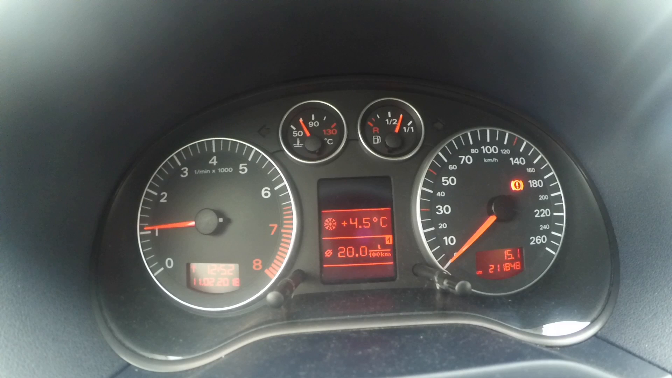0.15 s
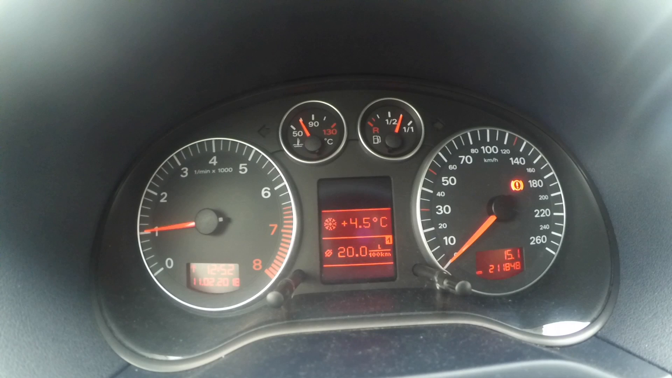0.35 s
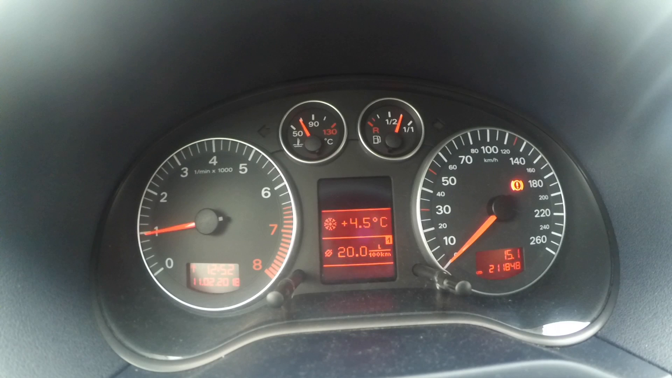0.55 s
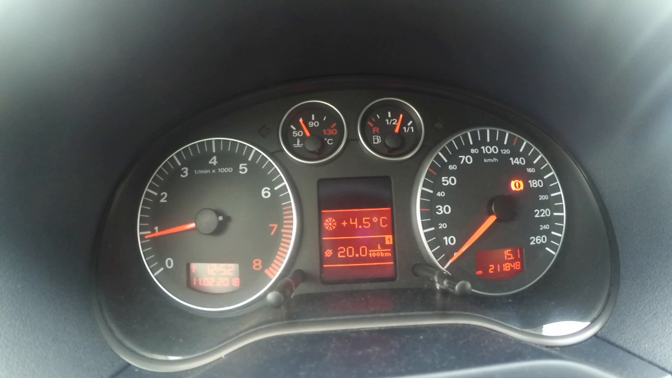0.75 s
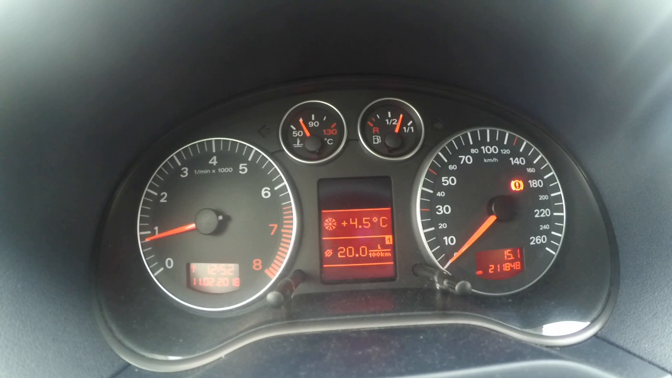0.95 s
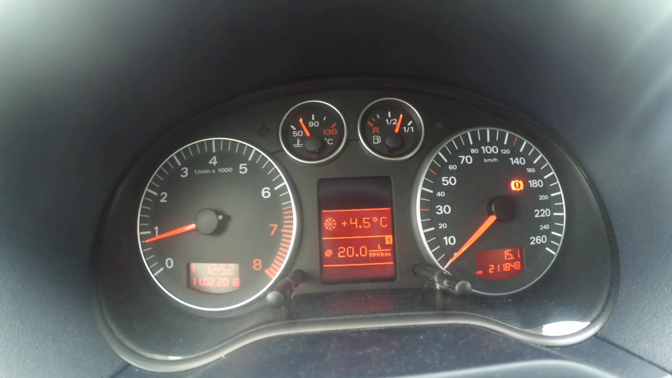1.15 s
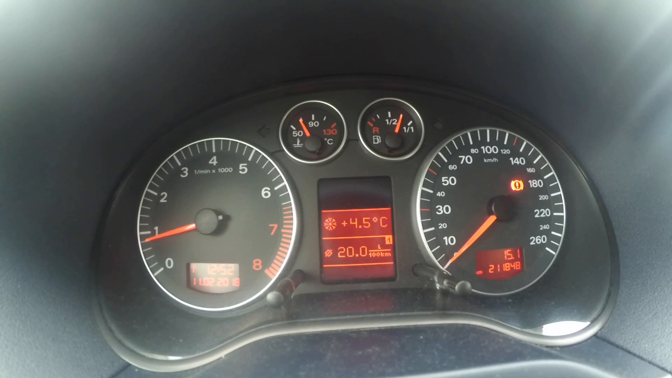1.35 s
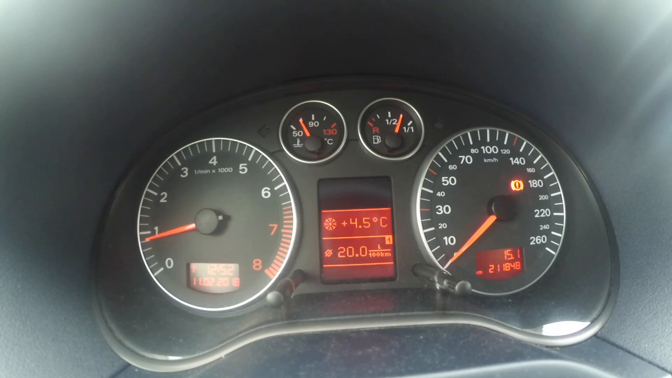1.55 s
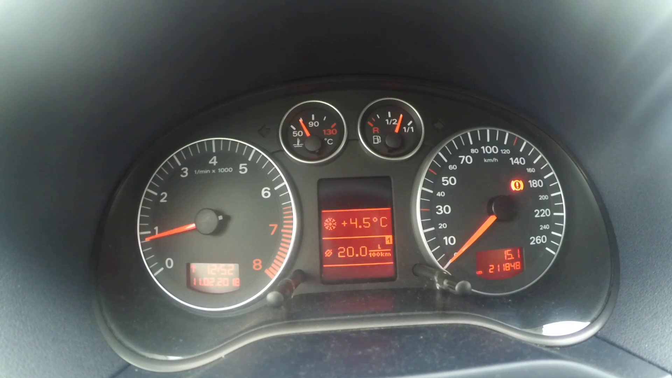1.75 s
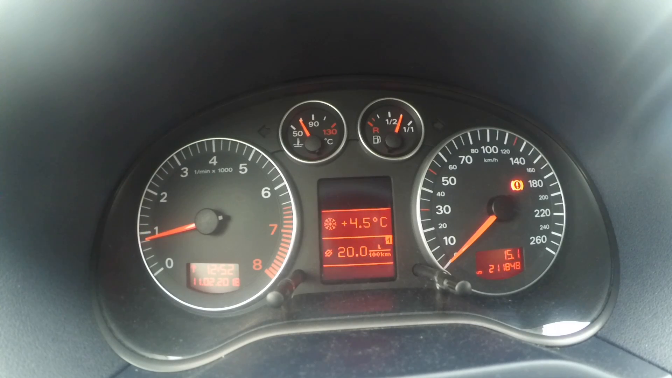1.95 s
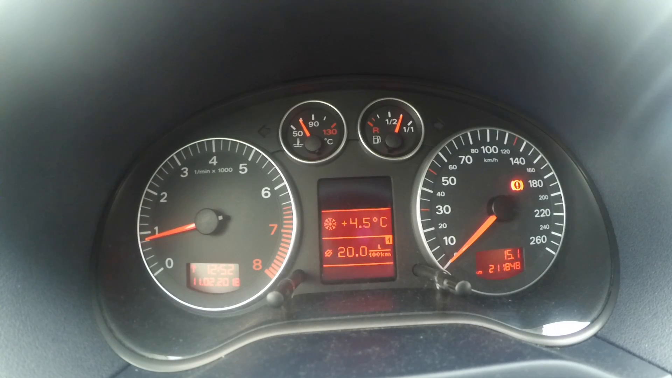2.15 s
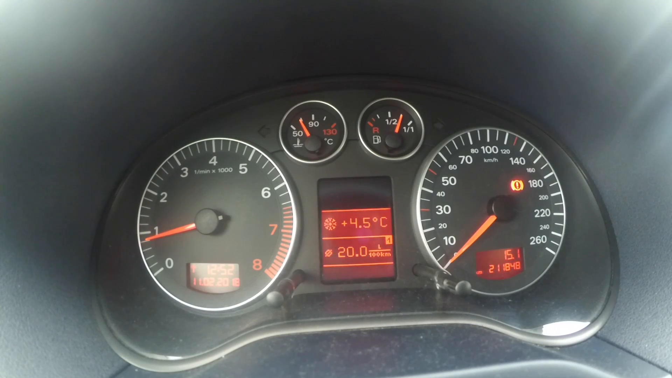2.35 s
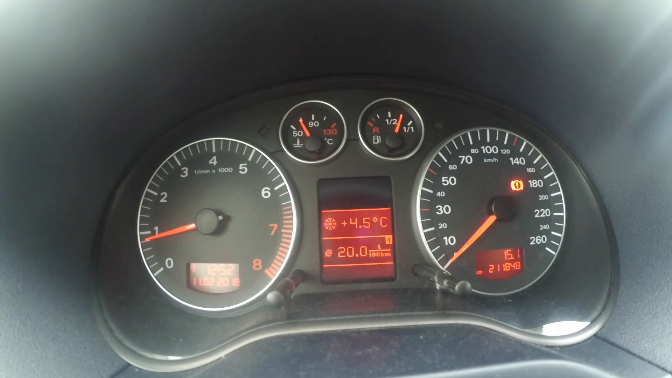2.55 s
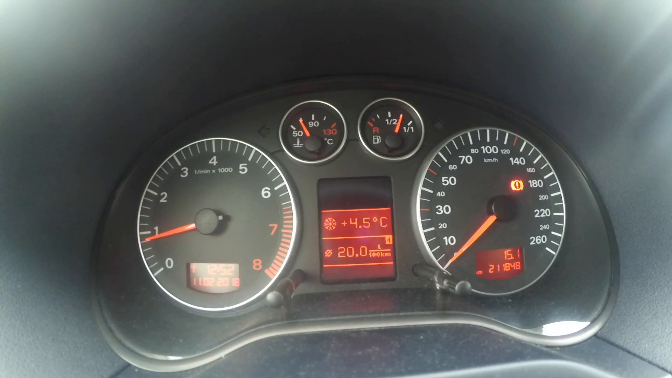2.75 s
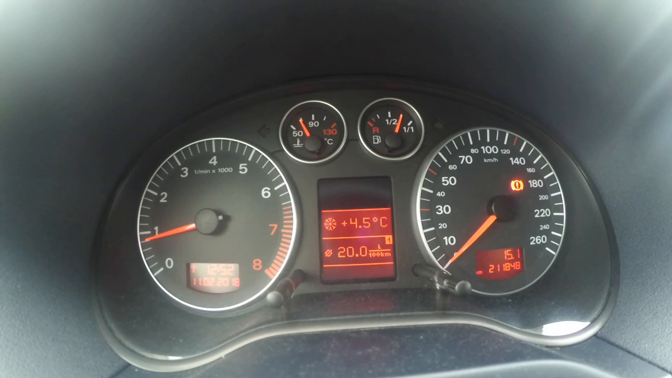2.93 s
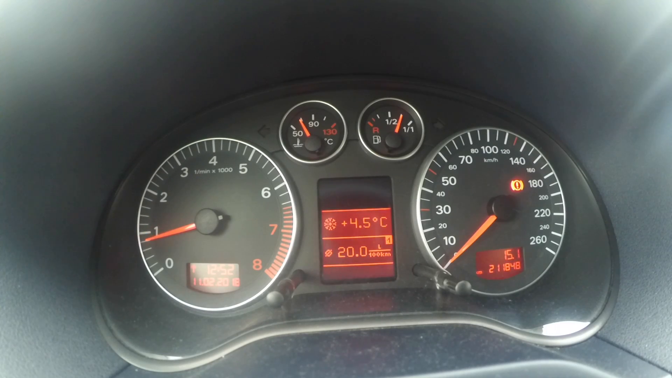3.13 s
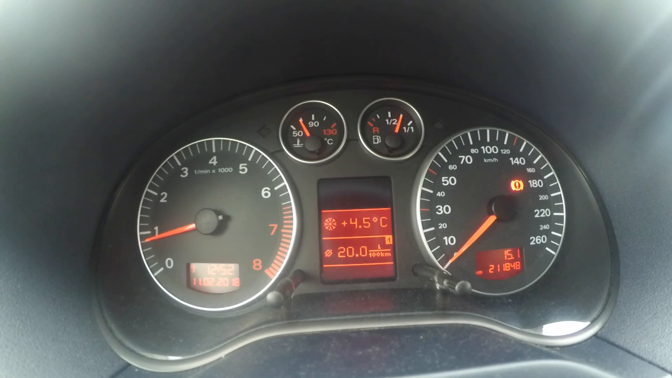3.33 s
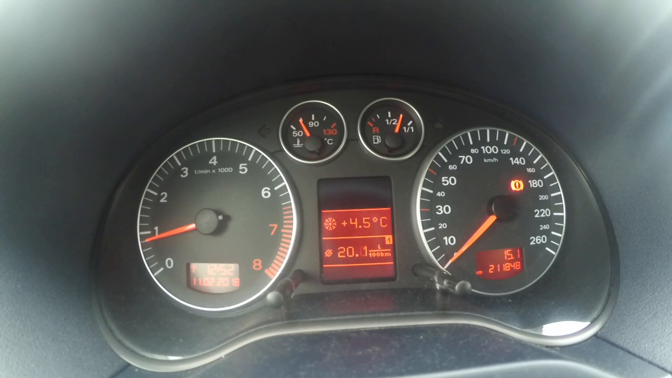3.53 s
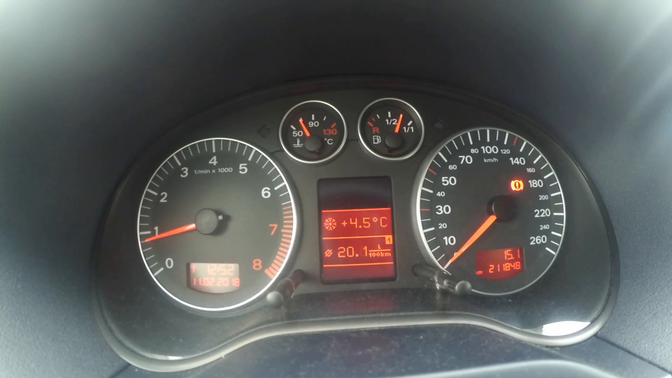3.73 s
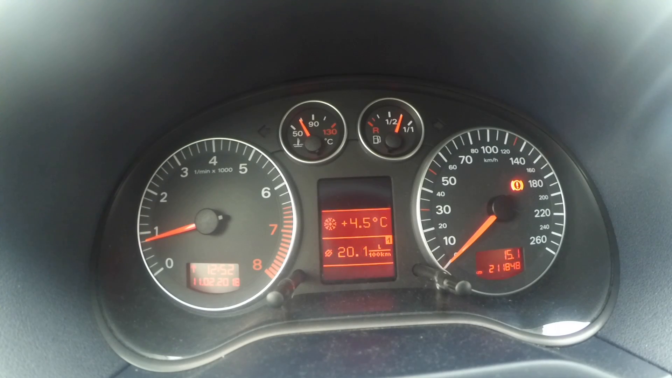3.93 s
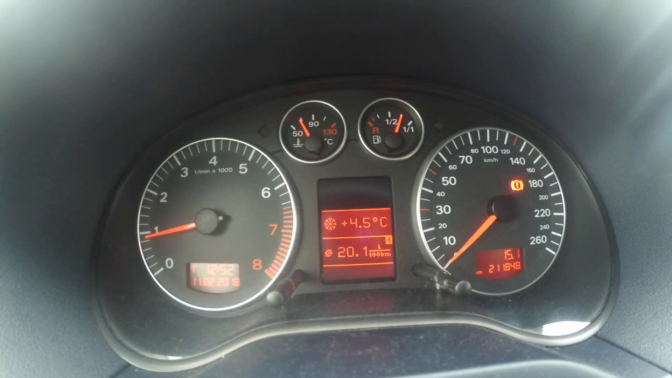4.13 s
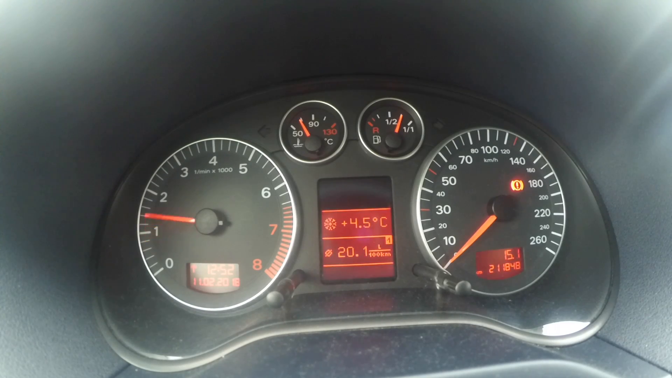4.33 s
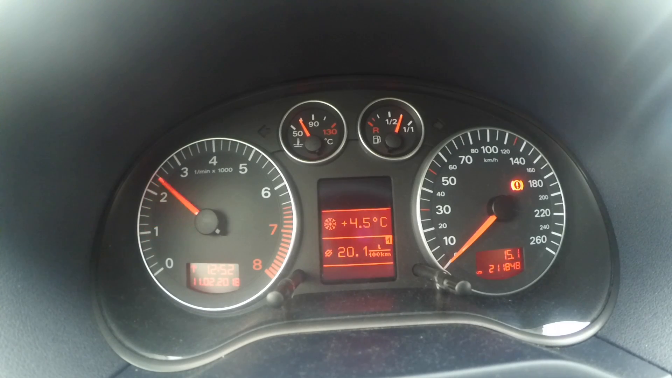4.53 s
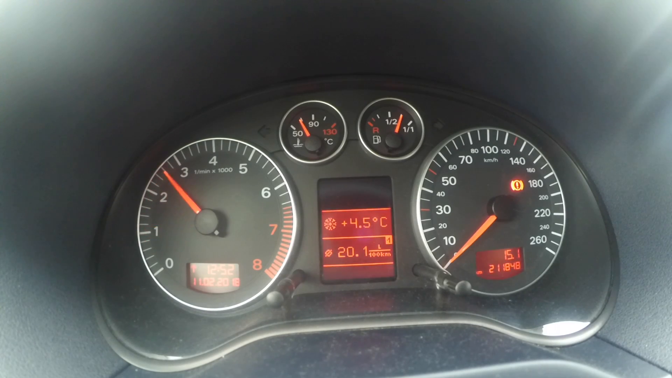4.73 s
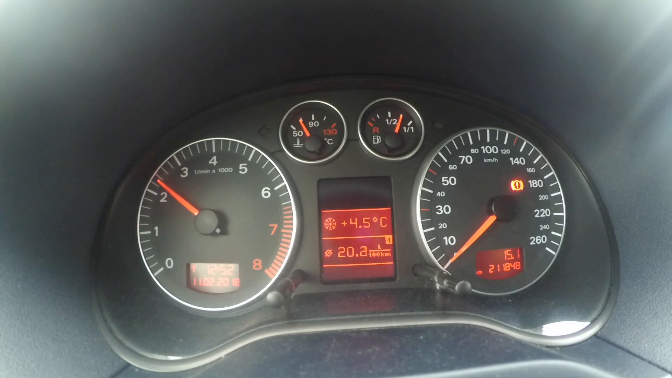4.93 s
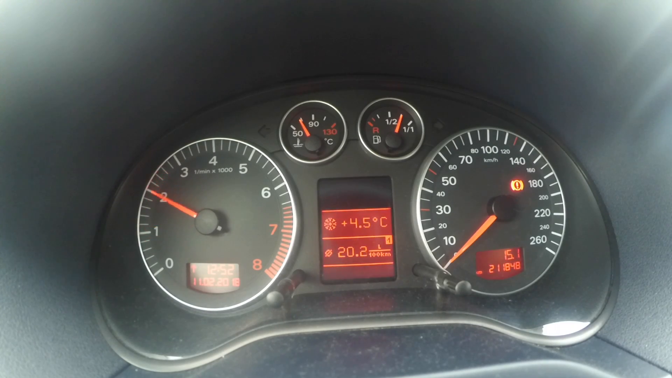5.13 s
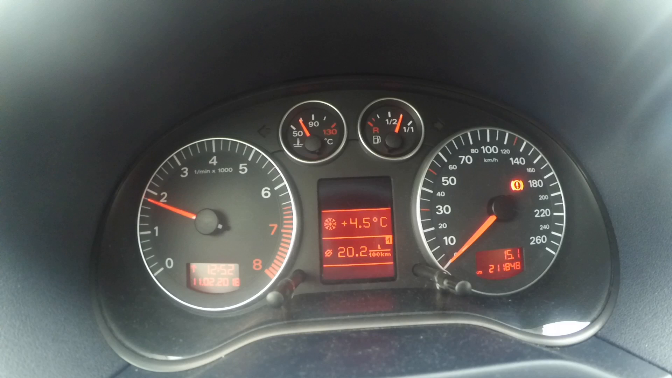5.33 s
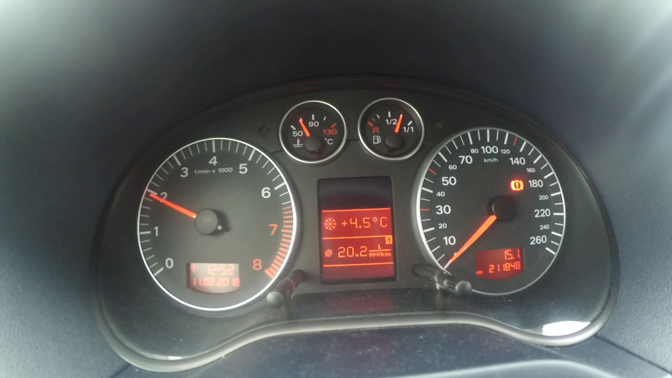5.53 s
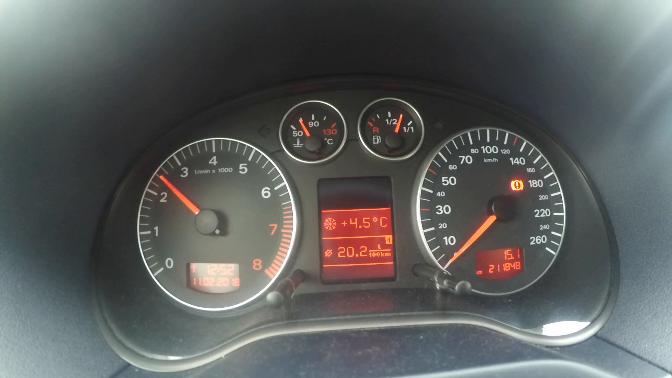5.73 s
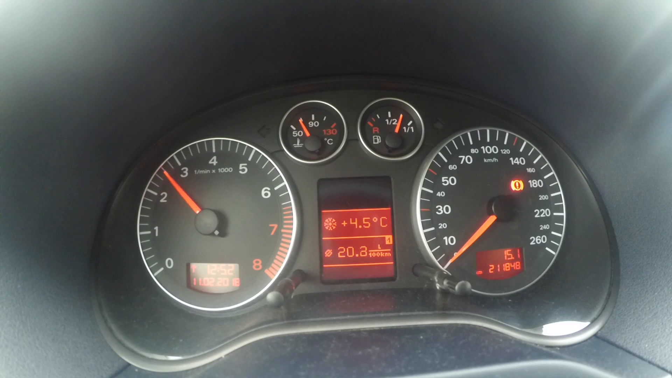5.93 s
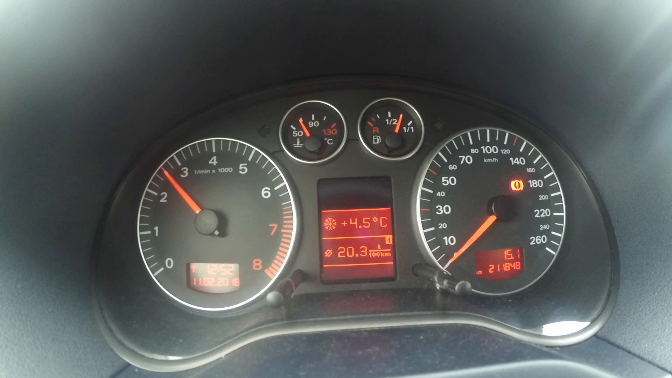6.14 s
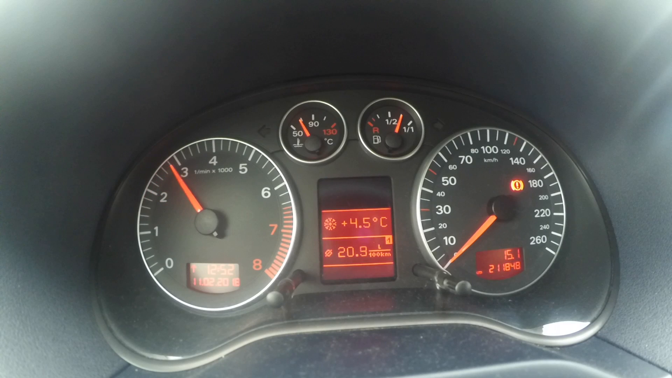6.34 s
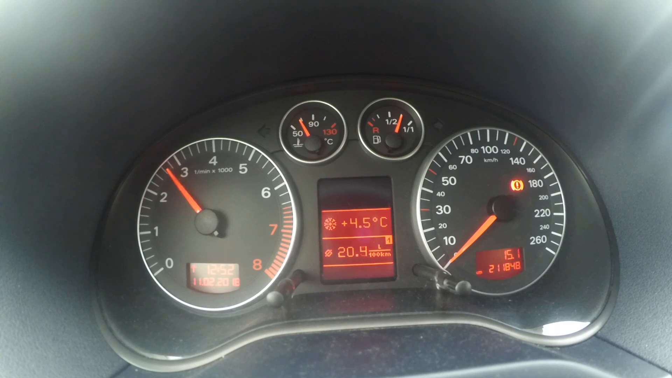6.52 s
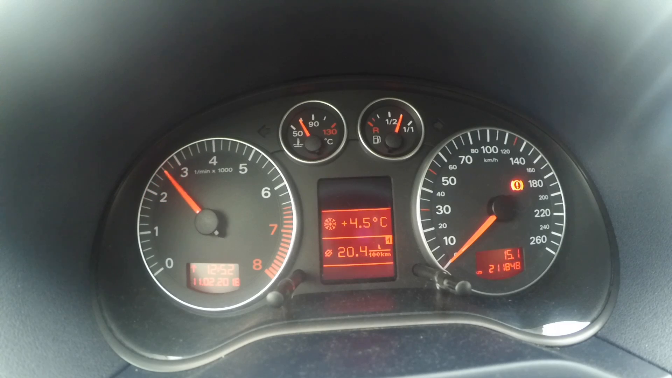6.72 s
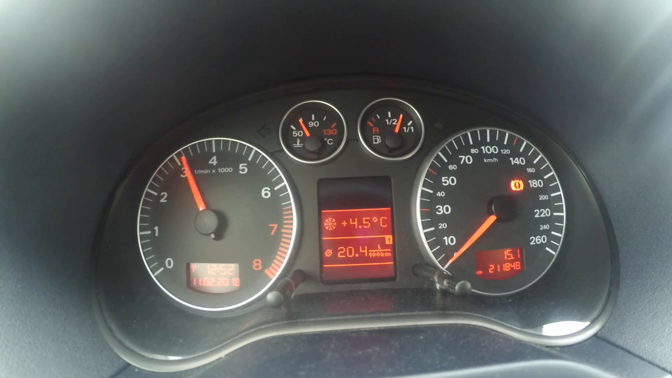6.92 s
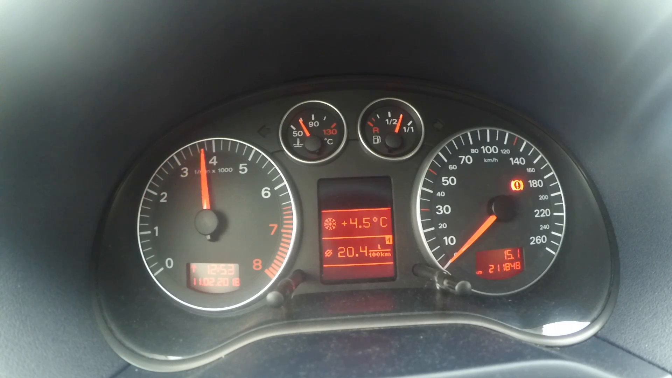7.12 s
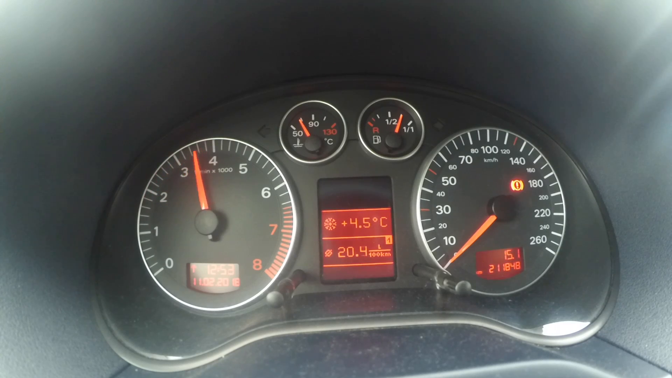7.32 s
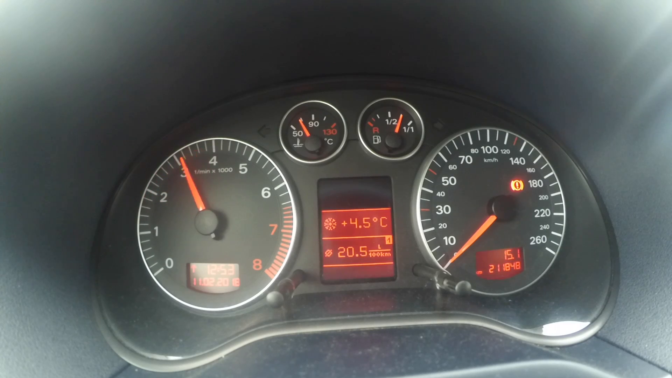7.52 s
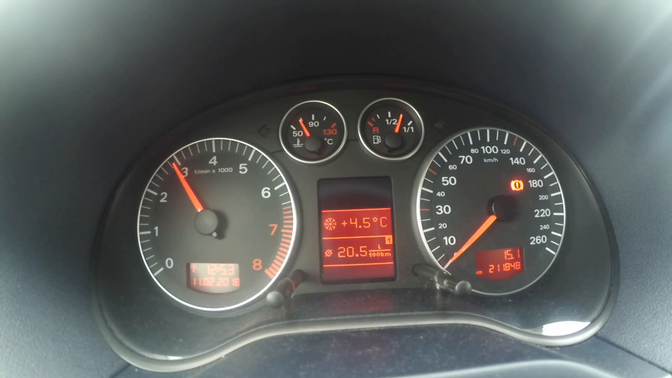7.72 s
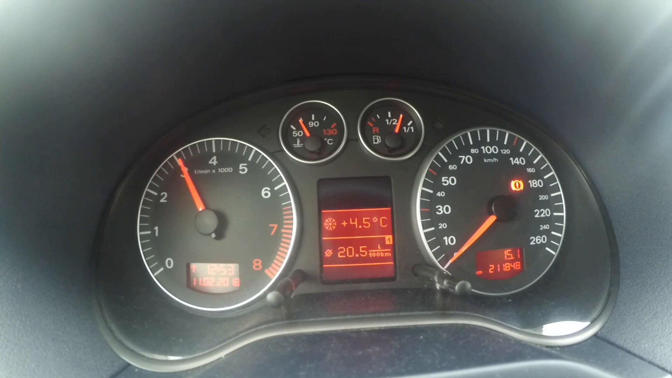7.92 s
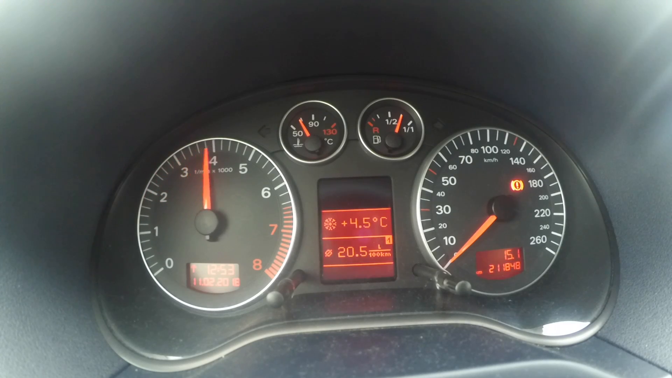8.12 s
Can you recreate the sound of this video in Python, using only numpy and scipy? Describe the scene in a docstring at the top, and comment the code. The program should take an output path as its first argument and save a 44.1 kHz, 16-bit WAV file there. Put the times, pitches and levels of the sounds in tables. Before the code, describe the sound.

From the driver's seat of a parked car, a four-cylinder petrol engine sinks to a quiet, low idle with a faint falling whine. A sleeve rustles, trim ticks and creaks, the seat knocks dully. After about four seconds the throttle is blipped five times, booming deeper and louder, and the released pedal clacks sharply at each peak. Close, dry cabin microphone with faint hiss.

```python
"""An engine settles to idle while a sleeve rustles, small parts tick and the seat knocks; then come five revs.
We sit inside a parked car with a four-cylinder petrol engine, made of sine tones and shaped noise.
The throttle pedal snaps back on its stop and bounces: bursts of rattling noise ring its narrow resonances.
Rustle, ticks and creak are shaped noise; knocks are fading sines over a noisy thud; whine and hum are sines.
The cabin booms at its low resonances, and the microphone adds a faint hiss."""
import sys
import numpy as np
from scipy import signal
from scipy.fft import rfft, irfft, next_fast_len
from scipy.io import wavfile
from scipy.ndimage import uniform_filter1d, map_coordinates

SR = 44100
rng = np.random.default_rng(int(sys.argv[2]) if len(sys.argv) > 2 else 0)


def invert_db(x):
    """Field ratio 10**(x/20) for x, a level in decibels (scalar or array-like)."""
    u = np.asarray(x, float) / 20
    return 10 ** u


def to_wav(sig):
    """Store sig (one row per channel, or 1-D mono) as 16-bit WAV at the path in sys.argv[1].

    Samples outside -1..1 are clipped; the rate is SR.
    """
    pcm = np.clip(np.atleast_2d(sig), -1, 1) * 32767
    pcm = np.round(pcm).astype(np.int16)
    wavfile.write(sys.argv[1], SR, pcm.T)  # frames by channels


N = 360363
T = np.arange(N) / SR  # time of every sample, in seconds

# Colour of the microphone's hiss: pitch_hz, level_db (relative, per Hz)
MIC_HISS = [(290, -29.5), (500, -8), (807, -10.5), (1340, -9), (1460, -17), (1600, -14), (2850, -17),
            (3110, -17.5), (5090, -22), (12300, -20), (16000, -28)]
HISS_DB = -74.5

# Loudness of the sleeve's rustle before its flicker: time_s, level_db
RUSTLE = [(0.0, -74.5), (0.33, -75.5), (0.61, -70), (0.95, -60.5), (1.1, -65), (1.2, -69), (2.22, -81.5),
          (2.4, -104)]
# Colour of cloth on cloth: pitch_hz, level_db (relative, per Hz)
CLOTH = [(470, -38), (800, -3), (1500, -1.5), (2100, -4.5), (2840, -6), (3510, -4.5), (4290, -8),
         (10800, -9), (16000, -17)]

# Small ticks of trim, and one light dull touch of the pedal (the last row):
# start_s, level_db, low_edge_hz, high_edge_hz, fade_by_60_db_s
TICKS = [(0.497, -62, 4000, 12000, 0.052), (0.773, -62, 1500, 12000, 0.36),
         (.970, -48.5, 1400, 4470, 0.085), (1.212, -49.5, 497.6, 2306, 0.066),
         (1.214, -49, 7100, 14200, 0.08), (1.666, -45.5, 346.8, 1860, 0.058),
         (2.744, -59, 350, 1170, 0.041), (2.955, -66, 698, 1500, 0.26), (3.597, -62.5, 450, 2600, 0.076),
         (4.885, -51.5, 586, 1400, 0.082), (4.994, -58, 697, 1500, 0.079), (6.286, -40, 800, 3000, 0.032)]
# Dull seat knocks: start_s, level_db, ring_hz, fade_by_60_db_s, rise_s
KNOCKS = [(0.195, -41.5, 257, .1, 0.0036), (0.237, -41, 192, 0.25, 0.0015), (0.49, -41, 121, 0.14, 0.0035),
          (0.767, -36, 235, 0.079, 0.0049), (0.826, -35.5, 376, 0.088, 0.0068),
          (1.144, -37.5, 360, 0.051, 0.0046), (1.213, -36.5, 116, 0.18, 0.00085),
          (1.232, -29.5, 78.4, 0.27, 0.024), (1.664, -37, 159, 0.25, 0.0012),
          (2.335, -43.5, 370, 0.095, 0.0018), (2.745, -39, 389.8, 0.058, 0.0012),
          (3.596, -39.5, 188, 0.064, 0.00056), (3.933, -45.5, 304, 0.072, 0.0012)]
# The seat frame answers every knock; levels are against the knock's own ring
SEAT_HZ, SEAT_FADE_S, SEAT_DB = 260, 0.07, -4
THUD_FADE_S, THUD_DB = 0.078, -2.5

# Resonances of a short creak of trim: pitch_hz, width_hz, level_db (relative)
CREAK_MODES = [(684, 34, 9), (910, 26, 8), (1280, 120, -1), (2230, 34, 3), (2650, 56, -8), (3350, 36, -7.5)]
CREAK_S, CREAK_HOLD_S, CREAK_DB = 0.191, .05, -55.5
CREAK_RISE_DB_PER_S, CREAK_FALL_DB_PER_S = 354, 1000

# A belt-driven whine that sinks: time_s, pitch_hz, level_db
WHINE = [(0, 346, -62), (.17, 328, -62), (.4, 301, -60), (.6, 276, -62), (.75, 264, -70)]
# The whine again while idling, at about 9.5 times the firing rate: time_s, pitch_hz, level_db
IDLE_WHINE = [(1.45, 263, -79), (1.7, 260.6, -64), (2.05, 260, -77), (2.2, 266, -79)]
# A steady engine hum at about 8 times the firing rate: time_s, pitch_hz, level_db
ENGINE_HUM = [(1.3, 221, -66), (1.55, 220, -60), (2.1, 219, -59), (2.3, 218, -66), (2.6, 216, -68)]

# Pedal hitting its stop: start_s, ring_db, hiss_db, rebound_boost_db, rebound_spacing (1 = usual)
PEDAL = [(4.385, -31.5, -42, -2.5, .93), (5.641, -36, -45, -5.5, 0.69), (6.153, -31, -39.5, -0.5, 1.01),
         (6.886, -30, -37.5, -2.5, .99), (8.007, -29.5, -35.5, -1, 1.01)]
# Bounces after each hit: delay_s, ring_db, hiss_db (levels against the hit)
REBOUNDS = [(0.0162, -10.5, -3.5), (0.038, -19, -14), (.055, -25, -21.5), (.074, -35.5, -31)]
# Resonances of the pedal: pitch_hz, width_hz, level_db (relative)
PEDAL_MODES = [(667, 34, 1.5), (780, 26, 1), (925, 85, 0.5), (1108, 60, 0), (1357, 49, 1), (1545, 60, 1),
               (1930, 67, 2), (2370, 88, -5), (3000, 85, -17.5), (3250, 86, -4), (3680, 630, -9),
               (4180, 390, -6.5), (4520, 200, -10), (5330, 70, -10), (6450, 180, -12), (8060, 180, -22.5),
               (12100, 1300, -23)]
# Colour of the pedal's hiss: pitch_hz, level_db (relative, per Hz)
PEDAL_HISS = [(1180, -27.5), (2000, -4), (2930, -15), (3280, -13.5), (4990, -15.5), (5490, -14.5),
              (10400, -15.5), (16000, -45.5)]
# The sole slides off just before each hit; its level is against the hit's hiss
SLIDE_LEAD_S, SLIDE_S, SLIDE_DB = .025, 0.014, -23.5
KICK = 14 / 3  # peak of the first clean touch, times the contact's ring level

# Engine speed: time_s, firing_rate_hz
SPEED = [(0.0, 37.41), (0.49, 30.56), (0.97, 25.05), (1.25, 27.54), (1.74, 27.63), (3.38, 25.85),
         (3.92, 25.85), (4.09, 33.13), (4.19, 42.4), (4.34, 69.8), (4.43, 87), (4.5, 94), (4.65, 84.77),
         (4.85, 74.6), (5.03, 63), (5.2, 59.2), (5.36, 58.8), (5.5, 70.63), (5.64, 84.54), (5.72, 91.74),
         (5.88, 82.03), (5.96, 82.47), (6.15, 93.1), (6.24, 96.4), (6.36, 91.23), (6.48, 82.4), (6.56, 83),
         (6.8, 97.94), (6.91, 120.4), (6.97, 126), (7.03, 129.8), (7.1, 126.8), (7.2, 116.5), (7.4, 105.4),
         (7.56, 94.8), (7.67, 94.55), (7.87, 103), (7.99, 122.9), (8.05, 131.2), (8.17, 133)]
IDLE_HZ = 27  # firing rate at which the idle levels below hold
# Load is read from the change of speed: none while falling this fast, full while climbing that fast
COAST_HZ_PER_S, PULL_HZ_PER_S = -30, 188
LOAD_SMOOTH_S, LOAD_DELAY_S = 0.036, .015
OPEN_AT_LOAD = 0.72  # from here on the boom is that of the open throttle

# Firing tone as the cabin booms with it, throttle open: pitch_hz, level_db
BOOM_PULLING = [(40, -53), (56, -37.5), (68, -38.5), (74, -38), (80, -26), (89, -40), (95, -29.5),
                (102, -35.5), (108, -32.5), (117, -21), (128, -18), (130, -17.5), (133, -42)]
# The same with the throttle shut: pitch_hz, level_db
BOOM_COASTING = [(40, -62), (59, -37), (63.5, -32.5), (66, -47), (68.5, -33.5), (71.5, -52), (75, -34),
                 (79, -30), (83, -32.5), (90, -26.5), (95, -26.5), (104, -27), (112, -33), (118, -24),
                 (127, -13.5), (130, -18), (133, -26.5)]
# Upper multiples of the firing tone: multiple, coasting_db, full_load_gain_db
UPPER = [(2, -52, 14), (3, -59, 13), (4, -63.5, 12)]
# What the cabin does to those multiples: pitch_hz, level_db
UPPER_PATH = [(80, -26), (110, -3.5), (130, 8), (143, 4.5), (170, -0.5), (190, 0.5), (220, -4), (240, -3),
              (263, 6), (285, 5.5), (310, -1.5), (350, 4), (385, -2), (420, 2), (530, -14)]
# A panel sings as a multiple sinks through it off load
SING_HZ, SING_WIDTH_HZ, SING_DB = 219, 11, 11.5
# Weaker tones locked to the crank: multiple (of the firing rate), level_db (against the throb's base)
ORDERS = [(.5, -15), (1.5, -5.5), (2.5, -10), (3.5, -10), (4.5, -19.5), (5, -10)]
# Tones of the idling engine: multiple (of the firing rate), level_db
IDLE_ORDERS = [(1, -63.5), (2, -55), (2.5, -69), (3, -65.5), (4, -58.5), (5, -62), (6, -63.5), (7, -77)]
# What the cabin does to the idle tones off load: pitch_hz, level_db
IDLE_PATH = [(25, -1.5), (55, -0.5), (72, -10.5), (85, -5), (105, -1.5), (140, 0), (200, -6)]
IDLE_LOAD_DB = 12  # gained by the idle tones at full load
SPREAD = 11  # tones arrive by different paths, out of step by multiple^2 / SPREAD turns

# How the cabin passes the throb and the crank tones when revving: pitch_hz, level_db
CABIN = [(76, -35.5), (130, -9), (168, -4.5), (200, -10), (225, -4), (247, -5.5), (263, 11), (276, -2),
         (296, -8), (349, -2), (425, -8.5), (479, -13), (543, -25.5), (595, -16.5), (700, -23.5),
         (910, -62.5), (1540, -120)]
# Colour of the throb at idle: pitch_hz, level_db (relative, per Hz)
IDLE_CABIN = [(24, -30), (40, -15), (123, -7.5), (199, -6.5), (408, -9.5), (519, -24.5), (700, -26.5),
              (910, -53), (1540, -120)]
# Colour of the roar through the bulkhead: pitch_hz, level_db (relative, per Hz)
BULKHEAD = [(290, -4.5), (500, -0.5), (549, -7.5), (603, -8), (841, 0), (983, -7.5), (1170, -2.5),
            (1390, -14), (1640, -14), (2350, -20), (2670, -17.5), (4130, -29), (6000, -39), (7800, -62.5),
            (13200, -120)]
# Resonances of bulkhead and dash panels: pitch_hz, width_hz, level_db (relative)
PANELS = [(840, 360, 1), (1090, 25, 2.5), (1560, 130, 2.5), (2630, 130, -0.5), (3500, 220, -10.5)]
# Colour of the body shake: pitch_hz, level_db (relative, per Hz)
RUMBLE = [(12, -50), (25, -32.5), (45, 9), (70, 10.5), (110, 11.5), (150, -1), (220, -49.5)]
# Base levels of the noisy layers: dB at idle, dB per doubling of speed, dB gained at full load
THROB, ROAR, SHAKE = (-58, 9.44, 5.77), (-75, 9.98, 1.87), (-59, 7.7, 2.7)
# The throb's noise against its base level; it stays under its tones when revving
IDLE_NOISE_DB, REV_NOISE_DB = -1.0, -3.5


def unit(x):
    """Scale a sound to rms 1."""
    return x / np.sqrt(np.mean(x ** 2) + 1e-20)


def curves(rows):
    """Give one value per sample for each column after the time."""
    times, *columns = np.transpose(rows)
    return [np.interp(T, times, column) for column in columns]


def during(rows):
    """Be 1 inside the time span of a table, with 20 ms soft ends."""
    first, last = rows[0][0], rows[-1][0]
    return np.interp(T, [first - .02, first, last, last + .02], [0, 1, 1, 0])


def wobble(rate):
    """Draw a smooth random curve with this many random points a second."""
    coarse = T[::64]
    points = rng.standard_normal(int(N * rate / SR) + 4)
    return np.interp(T, coarse, map_coordinates(points, [coarse * rate]))


def gain_along(spectrum, hz):
    """Read a gain from (pitch_hz, level_db) points on a log pitch axis."""
    f, db = np.transpose(spectrum)
    return invert_db(np.interp(np.log(hz + 1), np.log(f + 1), db))


def filtered(x, response):
    """Multiply the spectrum of a sound by a response that depends on frequency."""
    size = next_fast_len(len(x) + 8192)  # spare room for the ringing
    spectrum = rfft(x, size) * response(np.fft.rfftfreq(size, 1 / SR))
    return irfft(spectrum, size)[:len(x)]


def coloured(x, spectrum):
    """Shape a sound with a spectrum, then scale it to rms 1."""
    return unit(filtered(x, lambda hz: gain_along(spectrum, hz)))


def resonant(x, modes):
    """Ring a sound through (pitch_hz, width_hz, level_db) resonances with alternating signs."""
    def response(f):
        total = 0
        for k, (centre, width, db) in enumerate(modes):
            damping = 1j * f * width
            total = total + (-1) ** k * invert_db(db) * damping / (centre * centre - f * f + damping)
        return total
    return filtered(x, response)


def tone(hz, db, lag=0):
    """Make a sine that follows pitch and level curves (rms dB), delayed by lag turns."""
    turns = np.cumsum(hz) / SR
    return np.sqrt(2) * invert_db(db) * np.sin(2 * np.pi * (turns - lag))


def mic_hiss():
    """The microphone's own noise: a steady, faint, shaped hiss."""
    return invert_db(HISS_DB) * coloured(rng.standard_normal(N), MIC_HISS)


def rustle():
    """Cloth sliding on cloth: noise in coarse grains a few ms long."""
    grain = unit(uniform_filter1d(rng.standard_normal(N), size=150))
    cloth = coloured(rng.standard_normal(N), CLOTH)
    level_db = curves(RUSTLE)[0] + 1.2 * grain + 1.6 * wobble(30)
    return during(RUSTLE) * invert_db(level_db) * cloth


def small_ticks():
    """Trim ticks and one light pedal touch: noise bursts, each in its own band, dying away exponentially."""
    out, t = np.zeros(N + SR), np.arange(SR // 4) / SR
    strike = 1 - np.exp(-t / .0008)
    for start, db, low_hz, high_hz, fade in TICKS:
        burst = filtered(rng.standard_normal(len(t)),
                         lambda f: f / np.hypot(f, low_hz) / (1 + (f / high_hz) ** 6))
        out[round(start * SR):][:len(t)] += invert_db(db - 60 * t / fade) * strike * unit(burst)
    return out[:N]


def seat_knocks():
    """Each knock rings a low resonance and the seat frame over a dull thud of noise."""
    out, t = np.zeros(N + SR), np.arange(SR // 4) / SR
    thud_colour = [(50, -30.5), (120, 9), (420, -9), (800, -18.5), (2000, -44)]
    seat = invert_db(SEAT_DB - 60 * t / SEAT_FADE_S) * np.sin(2 * np.pi * SEAT_HZ * t)
    for start, db, hz, fade, rise in KNOCKS:
        noise = coloured(rng.standard_normal(len(t)), thud_colour)
        thud = invert_db(THUD_DB - 60 * t / THUD_FADE_S) * noise
        ring = invert_db(-60 * t / fade) * np.sin(2 * np.pi * hz * t)
        out[round(start * SR):][:len(t)] += invert_db(db) * (1 - np.exp(-t / rise)) * (ring + thud + seat)
    return out[:N]


def whine_and_hum():
    """Belt whine, heard twice, and the engine's hum: single sines that glide in pitch and level."""
    return sum(during(rows) * tone(*curves(rows)) for rows in (WHINE, ENGINE_HUM, IDLE_WHINE))


def creak():
    """Trim scrapes in uneven tiny slips, which sing in narrow resonances."""
    slips = rng.standard_normal(N) * invert_db(6.9 * rng.standard_normal(N))
    scrape = unit(resonant(slips, CREAK_MODES + [(1330, 530, -18.5)]))
    before_s = np.maximum(CREAK_S - T, 0)
    after_s = np.maximum(T - CREAK_S - CREAK_HOLD_S, 0)
    return invert_db(CREAK_DB - CREAK_RISE_DB_PER_S * before_s - CREAK_FALL_DB_PER_S * after_s) * scrape


def pedal():
    """The sole slides off with a hiss; each contact rattles about 10 ms into the pedal box."""
    t = np.arange(SR // 10) / SR
    shape = (1 - np.exp(-t / .0005)) * (np.exp(-(t / .007) ** 2) + .55 * np.exp(-t / .013))
    body, hiss, kick = np.zeros((3, N + SR))
    contacts = [(start, ring_db, hiss_db) for start, ring_db, hiss_db, *_ in PEDAL]
    for start, ring_db, hiss_db, boost, spacing in PEDAL:
        for delay, ring_change, hiss_change in REBOUNDS:
            contacts.append((start + spacing * delay, ring_db + ring_change + boost,
                             hiss_db + hiss_change + boost))
    for start, ring_db, hiss_db in contacts:
        body[round(start * SR):][:len(t)] += invert_db(ring_db) * shape
        hiss[round(start * SR):][:len(t)] += invert_db(hiss_db) * shape
        kick[round((start + .001) * SR):][:5] = KICK * invert_db(ring_db) * np.hanning(7)[1:-1]
    slide = sum(invert_db(hiss_db + SLIDE_DB) * np.exp(-((T - start + SLIDE_LEAD_S) / SLIDE_S) ** 2)
                for start, _, hiss_db, *_ in PEDAL)
    # the rattle is a spray of tiny separate impacts
    noise = rng.standard_normal((2, N)) * invert_db(3.5 * rng.standard_normal((2, N)))
    ring = resonant(body[:N] * noise[0] + kick[:N], PEDAL_MODES)
    ring = ring / np.std(resonant(noise[0], PEDAL_MODES))
    return ring + (hiss[:N] + slide) * coloured(noise[1], PEDAL_HISS)


def engine_motion():
    """Firing rate in Hz, and load from 0 to 1: an engine that speeds up is pulling."""
    hz = uniform_filter1d(curves(SPEED)[0], size=1800, mode="nearest")
    climb = uniform_filter1d(np.gradient(hz) * SR, int(LOAD_SMOOTH_S * SR), mode="nearest")
    climb = np.interp(T - LOAD_DELAY_S, T, climb)
    return hz, np.clip((climb - COAST_HZ_PER_S) / (PULL_HZ_PER_S - COAST_HZ_PER_S), 0, 1)


def engine_tones(hz, load, revving, throb_db):
    """Sines at multiples of the firing rate, each swelling as it crosses a cabin resonance."""
    opened = np.minimum(load / OPEN_AT_LOAD, 1)
    cabin = gain_along(BOOM_COASTING, hz) ** (1 - opened) * gain_along(BOOM_PULLING, hz) ** opened
    boom = cabin * tone(hz, 1.1 * wobble(25))
    upper, orders, idling = np.zeros((3, N))
    for k, db, gain in UPPER:
        nearness = np.exp(-((k * hz - SING_HZ) / SING_WIDTH_HZ) ** 2)
        level_db = db + gain * load + SING_DB * (1 - opened) * nearness + 3.44 * wobble(12)
        upper += gain_along(UPPER_PATH, k * hz) * tone(k * hz, level_db, lag=k ** 2 / SPREAD)
    for k, db in ORDERS:
        path = gain_along(CABIN, np.maximum(k * hz, 130))
        orders += path * tone(k * hz, throb_db + db + 4.6 * wobble(5))
    for k, db in IDLE_ORDERS:
        path = gain_along(IDLE_PATH, k * hz) ** (1 - opened)
        level_db = db + IDLE_LOAD_DB * load + 1.5 * wobble(2.93)
        idling += path * tone(k * hz, level_db, lag=k ** 2 / SPREAD)
    return np.sqrt(revving) * boom + revving * (upper + orders) + (1 - revving) * idling


def engine_throb(hz, revving):
    """Firing pulses and noise that beats with them, shaped by the cabin."""
    turns = np.cumsum(hz) / SR
    # no two firings are equally strong, which fills in between the tones
    fired = np.diff(np.floor(turns), prepend=0) * invert_db(2.2 * rng.standard_normal(N))
    beat = (1 + 0.045 * np.cos(2 * np.pi * turns)) * rng.standard_normal(N)
    drive = 0.15 * fired * np.sqrt(SR / hz) + beat
    idle = invert_db(IDLE_NOISE_DB) * coloured(drive, IDLE_CABIN)
    revved = invert_db(REV_NOISE_DB) * coloured(drive, CABIN)
    uneven_db = (1 + revving) * wobble(11)
    return invert_db(uneven_db) * ((1 - revving) * idle + revving * revved)


def engine_roar(hz):
    """Noise through the bulkhead and ringing panels, beating once a firing."""
    turns = np.cumsum(hz) / SR
    gated = (1 + 0.072 * np.cos(2 * np.pi * turns)) * rng.standard_normal((2, N))
    panels = resonant(resonant(gated[1], PANELS), [(1500, 3000, 0)])
    return invert_db(1.1 * wobble(22)) * (coloured(gated[0], BULKHEAD) + 0.27 * unit(panels))


def body_shake():
    """The car body shakes: low noise whose level wanders."""
    return invert_db(2.5 * wobble(13)) * coloured(rng.standard_normal(N), RUMBLE)


def engine():
    """Tones, throb, roar and body shake together; speed and load set their levels."""
    hz, load = engine_motion()
    revving = np.clip((hz - 36) / 18, 0, 1)  # 0 at idle, 1 well above it
    throb_db, roar_db, shake_db = (idle_db + per_doubling * np.log2(hz / IDLE_HZ) + gain * load
                                   for idle_db, per_doubling, gain in (THROB, ROAR, SHAKE))
    tones = engine_tones(hz, load, revving, throb_db)
    noises = invert_db(throb_db) * engine_throb(hz, revving) + invert_db(roar_db) * engine_roar(hz)
    return tones + noises + invert_db(shake_db) * body_shake()


def scene():
    """Everything heard from the driver's seat, as one channel."""
    touches = rustle() + small_ticks() + seat_knocks()
    return (touches + whine_and_hum() + creak() + pedal() + engine())[None]


def top_cut(x):
    """Nothing passes above the cut-off."""
    return signal.sosfilt(signal.butter(12, 16370, fs=SR, output="sos"), x)


def record(dry):
    """The microphone adds its hiss and a small constant offset."""
    mix = dry + mic_hiss() - .0019
    return top_cut(mix)


dry = scene()
out = record(dry)
to_wav(out)
```